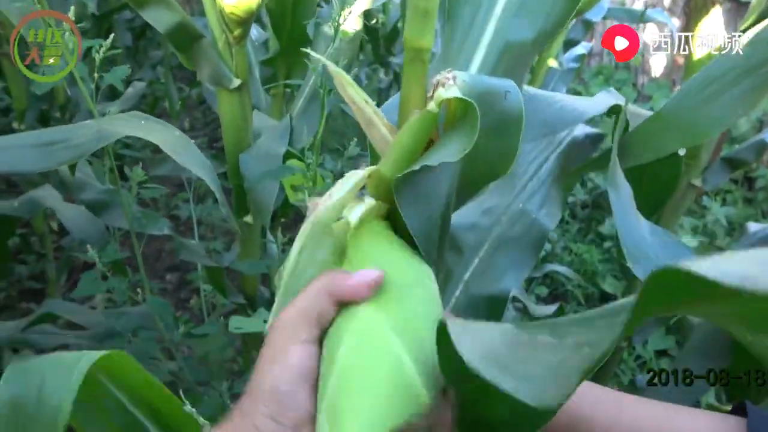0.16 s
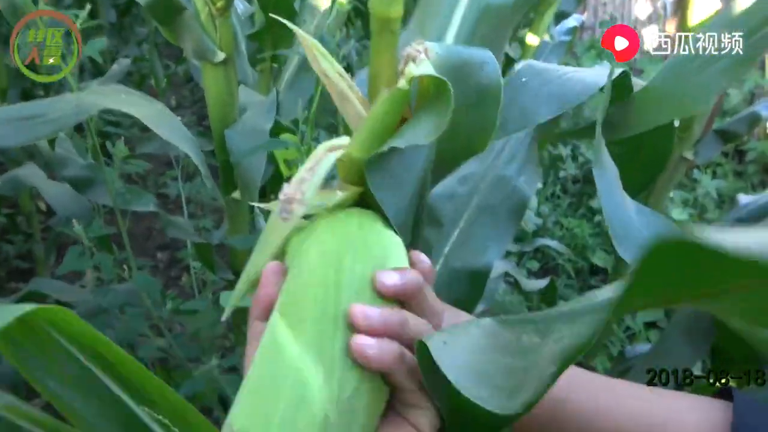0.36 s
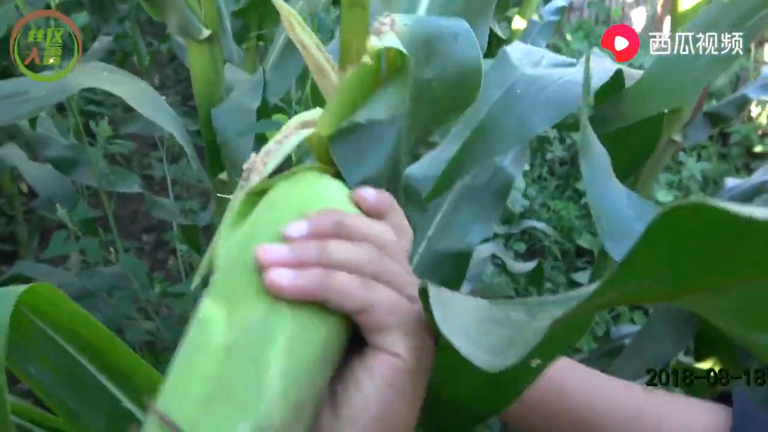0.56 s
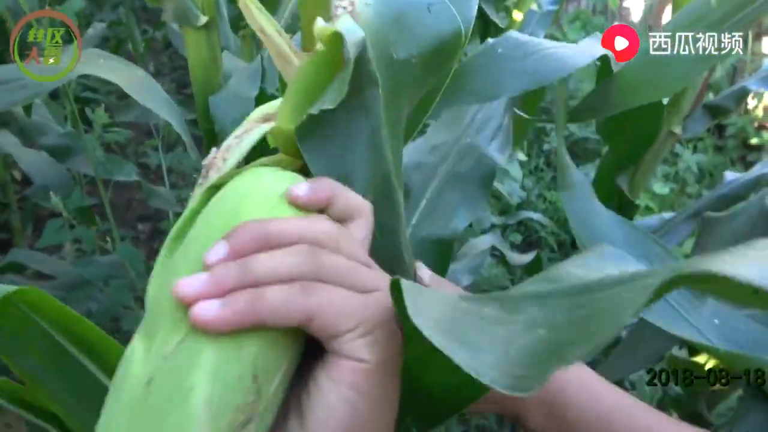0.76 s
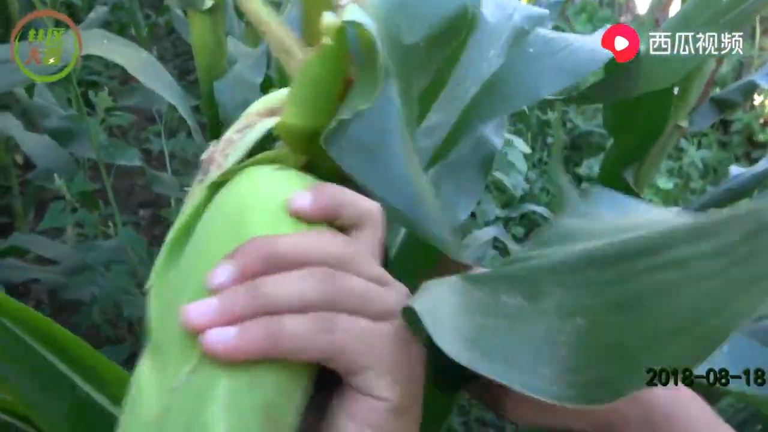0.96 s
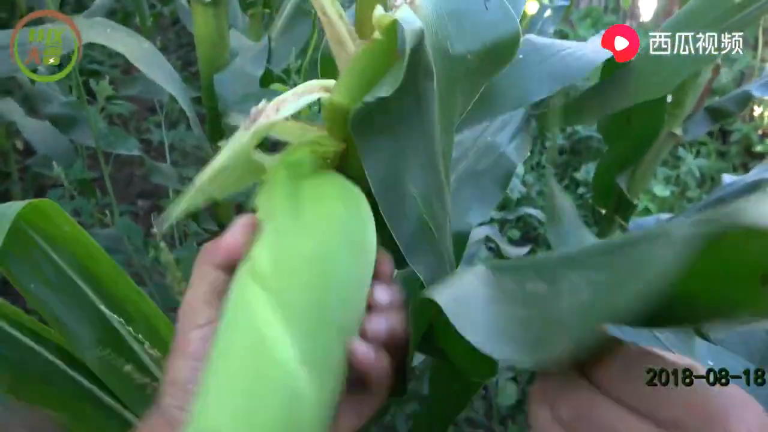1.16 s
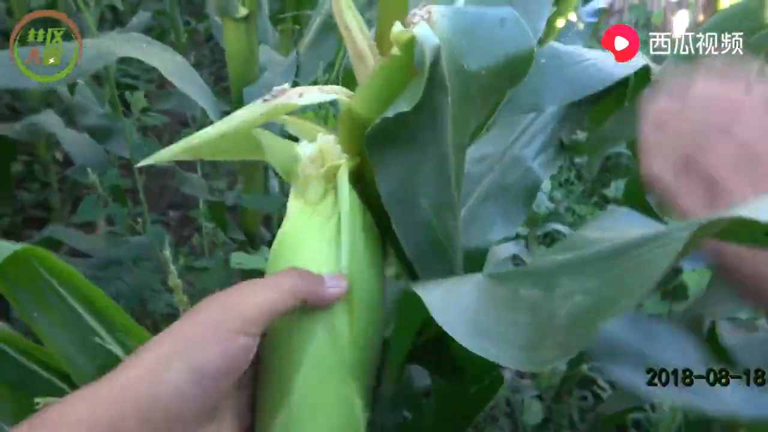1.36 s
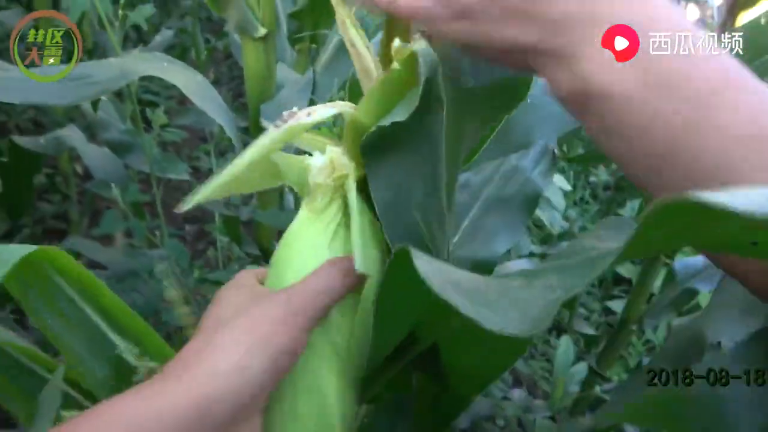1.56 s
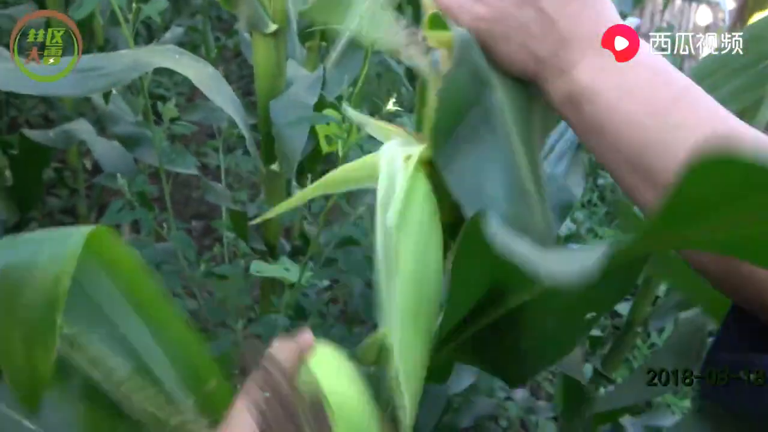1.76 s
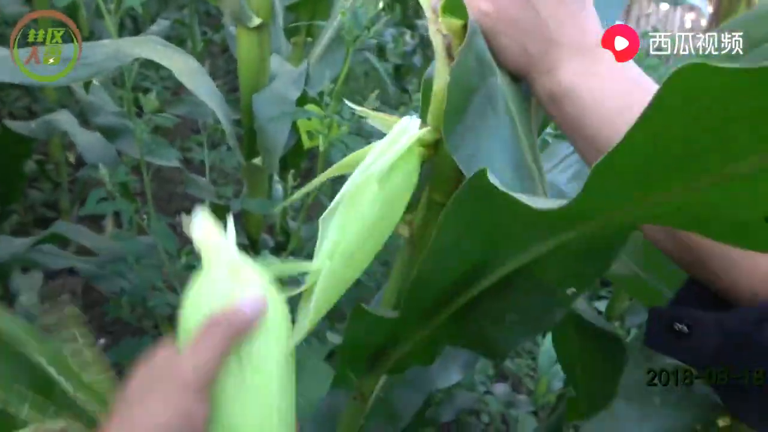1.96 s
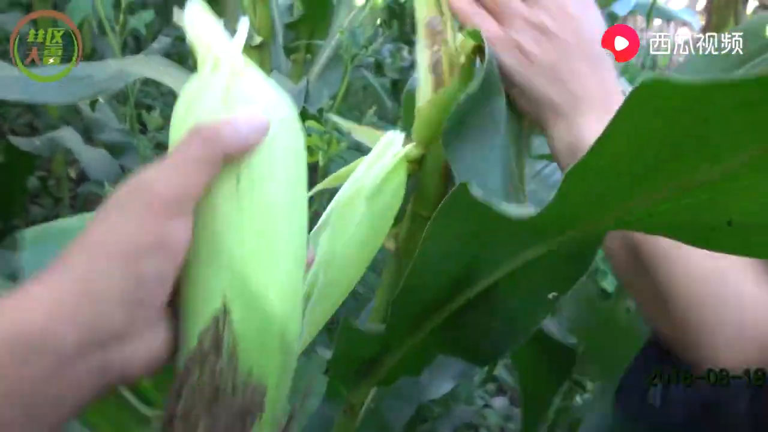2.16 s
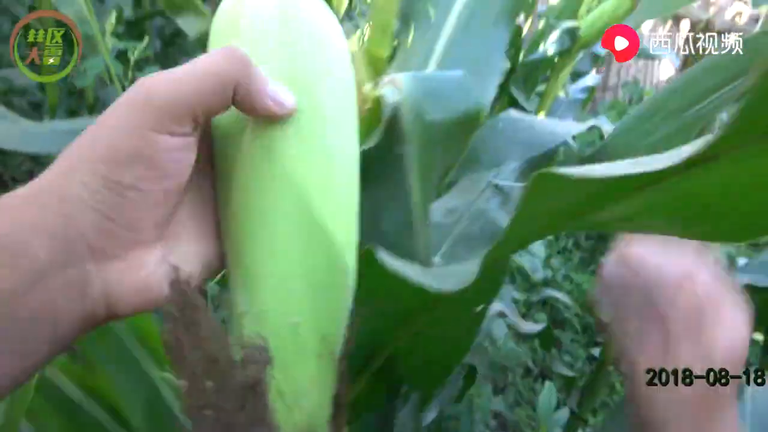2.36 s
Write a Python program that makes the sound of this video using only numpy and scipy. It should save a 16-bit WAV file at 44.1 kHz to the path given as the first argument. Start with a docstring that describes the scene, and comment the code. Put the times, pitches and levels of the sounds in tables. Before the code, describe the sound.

Corn is snapped off the stalk, close and dry outdoors. Faint leaf rustle swells from the start, with first snaps near 0.1 s and a dense crackling run from 0.3 to 0.6 s. More cracks come near 0.8 and 1.1 s, a sharp one with a rustle burst at 1.35 s, and a cluster with knocks near 1.75 s. Softer snaps, rustling and dull knocks over low rumble continue to 2.4 s.

```python
"""Hands bend an ear of corn off its stalk, close by in a garden.
A faint rustle, made of hiss and tiny crackles, swells as leaves and husks rub, and a first dense run of fibres
snaps: each snap is a burst of tiny breaks. The shaken stalk and moving air give a low rumble of filtered noise,
and puffs of noise ring as dull knocks. More snaps come near 0.8 and 1.1 s, at 1.35 s with a burst of
rustle, and in a cluster near 1.75 s. Rustle, knocks and mostly weaker snaps go on to the end."""
import sys
import numpy as np
from scipy import signal
from scipy.io import wavfile
from scipy.ndimage import uniform_filter1d

SR = 44100
rng = np.random.default_rng(int(sys.argv[2]) if len(sys.argv) > 2 else 0)


def elevation(decibels):
    """Turn decibel levels (scalar or array-like) into linear amplitude ratios."""
    levels = np.asarray(decibels, float)
    return 10 ** (levels / 20)


def pcm_store(signal):
    """Save signal as 16-bit PCM."""
    levels = np.round(np.clip(np.atleast_2d(signal), -1, 1) * 32767)
    wavfile.write(sys.argv[1], SR, levels.astype(np.int16).T)


N = 107118  # length in samples, about 2.43 s


def evened(x):
    """Scales a sound to an rms of 1."""
    return x / np.sqrt(np.mean(x ** 2) + 1e-20)


def read(points, hz):
    """Reads a table of (frequency, value) between its points, on a log-frequency axis."""
    f, value = np.transpose(points)
    return np.interp(np.log(hz + 1), np.log(f + 1), value)


def kernel(points, size=4096):
    """Builds a filter with the gains of a table; it responds only after its input (minimum phase)."""
    db = np.maximum(read(points, np.fft.rfftfreq(size, 1 / SR)), -100)
    both_halves = np.r_[db, db[-2:0:-1]]
    log_gain = np.log(elevation(both_halves))
    phase = -signal.hilbert(log_gain).imag
    return np.fft.ifft(np.exp(log_gain + 1j * phase)).real[:size // 2]


def colour(x, points):
    """Filters a sound by a table of gains."""
    return signal.oaconvolve(x, kernel(points))[:len(x)]


def resonate(x, hz, q):
    """Passes a sound through one resonance of gain 1; a larger q rings longer."""
    b, a = signal.iirpeak(hz, q, SR)
    return signal.lfilter(b, a, x)


def rumble():
    """The shaken stalk and moving air: low noise whose level rises and falls in lumps."""
    # strength of the rumble: (time [s], level [dB])
    rumble_level = [(0.0, -54), (0.38, -52.5), (0.4, -39), (0.46, -33.5), (0.51, -43), (0.55, -43),
                    (0.57, -50.5), (1.12, -47.5), (1.15, -38), (1.17, -58.5), (1.27, -45), (1.34, -45.5),
                    (1.66, -54), (1.7, -55), (1.73, -49), (1.85, -45), (1.99, -45), (2.06, -54),
                    (2.14, -44.5), (2.31, -55), (2.34, -45), (2.43, -55)]
    # colour of the rumble: (frequency [Hz], relative level [dB per Hz])
    rumble_colour = [(12, -4), (20, -11), (65, 4), (140, -5), (170, -4.5), (220, -32), (370, -120)]
    s, db = np.transpose(rumble_level)
    low_noise = evened(colour(rng.standard_normal(N), rumble_colour))
    return elevation(np.interp(np.arange(N) / SR, s, db)) * low_noise


def knocks():
    """Dull knocks of the ear against stalk and hand: a short puff of noise rings a damped low resonance."""
    # each knock: (time [s], peak level [dB], resonance [Hz])
    knock_list = [(0.364, -40, 780), (0.399, -36, 353), (0.497, -33, 286), (0.529, -27.5, 383),
                  (0.759, -20.5, 840), (0.789, -46, 790), (0.895, -36.5, 350), (1.004, -26.5, 394),
                  (1.069, -35, 272), (1.145, -32, 194), (1.487, -29.5, 766), (1.726, -17.5, 800),
                  (1.769, -25, 305), (1.941, -30, 589), (1.963, -19, 665), (2.015, -33.5, 283),
                  (2.074, -37, 406), (2.128, -25.5, 820), (2.17, -29.5, 714), (2.267, -41.5, 320),
                  (2.296, -42, 288), (2.339, -34.5, 274)]
    q, puff_t60_s, rise_s = 2.3, 0.022, 0.0036
    out, t = np.zeros(N + 4000), np.arange(4000) / SR
    for s, db, hz in knock_list:
        noise = rng.standard_normal(4000)
        puff = noise * np.minimum(t / rise_s, 1) * elevation(-60 * t / puff_t60_s)
        ring = resonate(resonate(puff, hz, q), hz, q)
        start = round(s * SR)
        out[start:][:4000] += elevation(db) * ring / abs(ring).max()
    return out[:N]


def crackles():
    """Tiny clicks of 16 pitches, a few of them large: each is a short fading noise through a resonance."""
    crackles_per_s, spread_db, clump_db, q = 3000, 5, 6.5, 1.3
    happens = rng.random(N) < crackles_per_s / SR
    size = happens * elevation(spread_db * np.minimum(rng.exponential(1, N), 3.8))
    kind = rng.integers(0, 16, N)
    out, t = np.zeros(N), np.arange(300) / SR
    for k, hz in enumerate(np.geomspace(14000, 500, 16)):
        t60_s = 0.0017 + 0.00027 * k  # the lower the pitch, the longer the click
        grain = rng.standard_normal(300) * elevation(-60 * t / t60_s)
        click = resonate(grain / np.linalg.norm(grain), hz, q)
        out += signal.oaconvolve(size * (kind == k), click)[:N]
    # crackles come in clumps: a slow random swing of their level
    clumps = evened(uniform_filter1d(uniform_filter1d(rng.standard_normal(N), 500), 300))
    return evened(out * elevation(clump_db * clumps))


def rustle():
    """Rubbing leaves and husks: friction hiss and crackles, coloured by the leaf, in drifting patches."""
    # strength of the rubbing, the last two added to the first in their part of the spectrum:
    # (time [s], level [dB], extra level of the low part [dB], extra level of the treble [dB])
    rubbing = [(0, -39, 2, -7), (0.06, -35.5, 0, 4), (0.11, -30, -4, -6), (0.17, -28.5, 2, 2),
               (0.26, -25, -4, -1.5), (0.33, -20.5, -5.5, -7.5), (0.38, -24, 0, -5), (0.43, -28, 7.5, 1),
               (0.475, -32.5, 2.5, -5.5), (0.51, -31.5, 5, -1), (0.535, -23, -6, -2), (0.57, -28, -4, -4),
               (0.595, -34, 3, -0.5), (0.63, -27.5, 1, 0.5), (0.67, -32.5, 1, -4.5), (0.74, -32, 3, -2.5),
               (0.78, -28.5, 4, -8), (0.82, -33, 4, -4.5), (0.875, -39, 9, -1.5), (0.92, -35.5, 6, -1.5),
               (0.97, -34, -1, -7), (1.001, -35, 7, 4), (1.031, -34.5, -2.5, -8), (1.07, -26.5, 0, 0),
               (1.12, -31, -2, 1), (1.159, -28, 4, 0.5), (1.2, -23, -6, -2), (1.26, -27, -2.5, -2.5),
               (1.327, -31.5, 4, 3), (1.355, -19, -14, -12), (1.38, -26.5, -5.5, -2),
               (1.41, -23.5, -9, -0.5), (1.46, -28.5, -6, -8), (1.5, -30.5, -1, -7.5),
               (1.56, -33.5, 0.5, 0), (1.6, -29.5, -2, -4), (1.645, -37.5, 4.5, -2.5),
               (1.7, -29.5, 0.5, -3.5), (1.731, -21, 4, -2), (1.75, -23.5, 5, 5), (1.78, -30, 4, 2.5),
               (1.805, -29, 2, -1), (1.85, -26.5, 1.5, 0), (1.92, -30.5, 6.5, -3.5), (1.97, -28.5, 9, -5.5),
               (2.05, -34, 2.5, -3.5), (2.1, -30.5, 3, -7), (2.12, -35, 3, -8.5), (2.2, -34.5, 10, 3),
               (2.24, -36, 3.5, 5.5), (2.29, -31, 4, -5), (2.36, -32, 3.5, 3.5), (2.43, -32.5, 4, -2)]
    # colour of the leaf: (frequency [Hz], relative level [dB per Hz])
    leaf = [(88, -17), (150, -11.5), (271, -5.5), (583, -9), (847, -7), (1280, -2), (2130, -0.5),
            (8790, -6), (15300, -20), (16500, -44)]
    hiss_db, crackle_db = 1, -7.5  # against each other
    low_hz, treble_hz, patch_db = 1190, 6000, 1.5

    raw = elevation(hiss_db) * rng.standard_normal(N) + elevation(crackle_db) * crackles()
    hz, t, z = signal.stft(evened(colour(raw, leaf)), SR, nperseg=256, noverlap=192)
    s, level, low, treble = np.transpose(rubbing)
    # random level changes, smoothed over pitch and then over time
    patches = uniform_filter1d(rng.standard_normal(z.shape), 5, 0)
    patches = evened(uniform_filter1d(patches, 16, 1))
    low_share = 1 / (1 + (hz / low_hz) ** 4)
    treble_share = 1 / (1 + (treble_hz / (hz + 1)) ** 4)
    db = np.interp(t, s, level) + patch_db * patches
    db += np.outer(low_share, np.interp(t, s, low))
    db += np.outer(treble_share, np.interp(t, s, treble))
    return signal.istft(z * elevation(db), SR, nperseg=256, noverlap=192)[1][:N]


def snaps():
    """Snapping fibres: a main break and a dying burst of smaller ones, as a crack and a ring of the husk."""
    # each snap: (time [s], peak level [dB], ring of the husk [Hz], ring against crack [dB],
    # time for the ring's breaks to fade by 60 dB [s], brightness of the crack [dB per octave])
    snap_list = [(0.1207, -11, 1220, -5, 0.014, -2.5), (0.171, -13, 2260, -4, 0.026, -2),
                 (0.2849, -4, 1920, -25, 0.021, -3.5), (0.302, -6, 1590.0, -9, 0.018, -1),
                 (0.312, -12.5, 2400, 5, 0.015, 7), (0.334, -5, 4850, -9, 0.015, -3),
                 (0.3497, -1.5, 2900, -9, 0.012, -1.5), (0.3623, -6.5, 3400.0, -10, 0.015, -6),
                 (0.3668, -2.5, 1060, -1, 0.0087, 1), (0.3817, -5, 2970.0, -6, 0.022, 3),
                 (0.4114, -13.5, 3620.0, -3.0, 0.018, 4), (0.467, -17.5, 6000, -2, 0.013, -3),
                 (0.49, -9, 5250.0, -9, 0.022, -4), (0.4946, -4, 6100, -8, 0.039, -3.5),
                 (0.4987, -6, 1520, 4.5, 0.013, 10), (0.5186, -3.5, 3550, -13, 0.018, -1),
                 (0.5318, -3, 1640.0, -8.5, 0.021, -4), (0.5414, -12, 5430.0, -1.0, 0.019, -8),
                 (0.5484, -13.0, 3830.0, -8, 0.022, 2), (0.554, -7.5, 5740, -2.0, 0.034, -5),
                 (0.5633, -17, 5430.0, 2, 0.022, -6), (0.6015, -9.5, 2970.0, -10, 0.035, 0.1),
                 (0.6203, -13.5, 1630, 3.5, 0.013, 0.5), (0.632, -19, 5040, -6, 0.012, 5),
                 (0.7624, -3, 1610, 0.5, 0.015, 1.0), (0.7641, -7.5, 1770, -1, 0.028, -5),
                 (0.772, -12.5, 2100, -5, 0.028, -5), (0.784, -19, 4820.0, 1, 0.022, -2.9),
                 (0.791, -7, 895, -3.5, 0.03, 2.6), (0.837, -17, 1400, -1, 0.025, -3),
                 (0.8973, -11, 3430, -4, 0.054, -4), (0.9627, -11.5, 7300, -1, 0.039, -3.5),
                 (0.9818, -16, 3480, 7, 0.014, 0.1), (1.008, -5.5, 2500, -5.5, 0.035, -3.5),
                 (1.0523, -9.5, 3730, -1.0, 0.017, -0.5), (1.0724, -18, 6630.0, 5, 0.016, 5),
                 (1.0787, -13, 1460.0, -10, 0.015, -9.5), (1.0994, -12.5, 1640.0, -21, 0.027, -2),
                 (1.1511, -8, 1190, -4.5, 0.018, -4), (1.1532, -7, 7140, -4, 0.031, -2),
                 (1.353, -6, 2460, -4, 0.043, -4), (1.3578, -9.5, 5500, 17, 0.033, 14),
                 (1.4877, -17.5, 3190.0, -4, 0.036, 1), (1.6642, -19.5, 6800, 3, 0.022, -6),
                 (1.7034, -20, 1460.0, 0.0, 0.017, -3), (1.7091, -10, 1410, 1.0, 0.036, -1.5),
                 (1.7396, -6.5, 1450, 0, 0.064, -7.5), (1.7485, -6.5, 1400, 4, 0.056, -8),
                 (1.757, -11, 4740, 5, 0.016, -7), (1.7698, -4, 1430, -4.5, 0.02, 0),
                 (1.7911, -14, 2710.0, -12, 0.019, -5), (1.9603, -17.5, 1420.0, 2, 0.028, 5),
                 (2.0765, -18, 1860, -8, 0.016, -13), (2.103, -18.0, 3970, 4, 0.022, 2),
                 (2.1313, -21, 2110.0, 8, 0.03, 2), (2.144, -21, 2000, 12, 0.026, -2),
                 (2.1746, -21, 1320, 8, 0.041, -9), (2.2258, -8, 6100, -4, 0.02, 13.5),
                 (2.2711, -15, 5330, -7, 0.027, -1.7)]
    # colour of the crack before its brightness is added: (frequency [Hz], relative level [dB])
    crack_colour = [(30, -64), (200, -15), (800, -6), (2500, 6.5), (6000, 7.9), (10000, 3.5), (16000, -12)]
    ring_q, breaks_per_s, rise_s = 1.45, 5600, 0.000243
    tail_db, tail_t60_s = -34, 0.092  # faint noise after the breaks, set against their total strength
    main_break = 1.6  # size against the small ones
    crack_share = 0.46  # the crack's breaks fade in this share of the ring's time

    out, t = np.zeros(N + 4000), np.arange(4000) / SR
    rise = (1 - np.exp(-t / rise_s)) ** 2
    for s, db, hz, ring_db, t60, bright_db in snap_list:
        sizes, tail_noise = rng.standard_normal((2, 4000))
        fade_db = -60 * t / max(t60, .003)
        breaks = rise * sizes * (rng.random(4000) < breaks_per_s / SR)
        breaks[round(rise_s * SR)] = main_break * np.sign(sizes[0])
        fading = breaks * elevation(fade_db)
        tail = rise * elevation(tail_db - 60 * t / tail_t60_s) * tail_noise * np.linalg.norm(fading)

        # the brightness tilts the colour around 4 kHz, and stays level below 1.5 kHz
        tilted = [(f, d + bright_db * np.log2(max(f, 1500) / 4000)) for f, d in crack_colour]
        crack_breaks = breaks * elevation(fade_db / crack_share) + tail
        crack = signal.oaconvolve(crack_breaks, kernel(tilted, size=512))[:4000]
        ring = resonate(resonate(fading + tail, hz, ring_q), hz, ring_q)
        both = evened(crack) + elevation(ring_db) * evened(ring)
        start = round(s * SR)
        out[start:][:4000] += elevation(db) * both / abs(both).max()
    return out[:N]


def scene():
    """Near-mono sound leaning left in the bass; a scattered copy of it differs between the microphones."""
    # strength of the scattered copy before it is doubled and the width table is applied: (frequency [Hz], level
    # [dB])
    side_level = [(60, -23), (250, -13), (700, -14), (1500, -22.5), (2300, -22), (3200, -29.5), (4500, -30),
                  (5500, -11), (9000, -9.5), (10500, -16), (12500, -8.5), (16000, -15)]
    # lean to the left before the width table is applied: (frequency [Hz], left minus right [dB])
    tilt = [(60, .4), (130, 0), (300, 6), (600, 3.8), (1500, 1.5), (4000, 0.6), (15000, .1)]
    # how wide the stereo is heard over time: (time [s], change of the low part [dB], change of the treble [dB])
    width = [(0, -1, -3), (.15, -3.5, -10), (.36, -4, -13), (.42, -6, -1), (.57, 4, -3), (.6, -2, -34),
             (.65, -2, -19), (.67, -6, 1), (.86, -5.5, -7), (.89, -3, -4), (1.03, -6, 3), (1.06, -17, -23),
             (1.14, 1, 4), (1.16, -12, 2), (1.2, -4, -7), (1.34, 3.5, -11), (1.38, 9, -1.5), (1.72, -4, -2),
             (1.75, -14, -13), (1.8, -11, -14), (1.83, -12, 1), (2.1, 6.5, 9.5), (2.2, 7, -3), (2.3, 1, -1),
             (2.43, -7, 4)]
    split_hz = 3000  # between the low part and the treble

    mid = rumble() + knocks() + rustle() + snaps()
    hz, t, z = signal.stft(mid, SR, nperseg=512, noverlap=384)
    s, low_db, treble_db = np.transpose(width)
    low_share = 1 / (1 + (hz / split_hz) ** 4)
    width_db = np.outer(low_share, np.interp(t, s, low_db))
    width_db += np.outer(1 - low_share, np.interp(t, s, treble_db))
    # random phases scatter the copy
    phases = np.exp(2j * np.pi * rng.random(z.shape))
    scattered = 2 * elevation(read(side_level, hz))[:, None] * phases
    right_to_left = elevation(-read(tilt, hz))
    lean = (1 - right_to_left) / (1 + right_to_left)
    side_z = z * elevation(width_db) * (scattered + lean[:, None])
    side = signal.istft(side_z, SR, nperseg=512, noverlap=384)[1][:N]
    return np.array([mid + side, mid - side])


def top_cut(x):
    """Nothing passes above the cut-off."""
    return signal.sosfilt(signal.butter(12, 16990, fs=SR, output="sos"), x)


def record(dry):
    """The camera's band limit: a steep filter takes away the treble above about 16 kHz."""
    edge = signal.firwin(255, 16000, window=("kaiser", 8), fs=SR)
    limited = signal.oaconvolve(dry, edge[None], "same")
    return top_cut(limited)


dry = scene()
out = record(dry)
pcm_store(out)
```